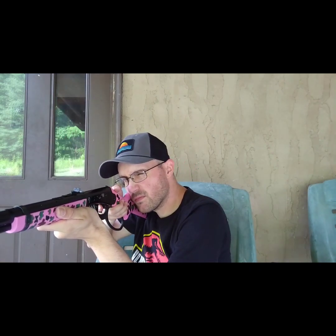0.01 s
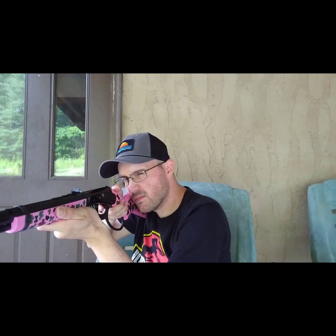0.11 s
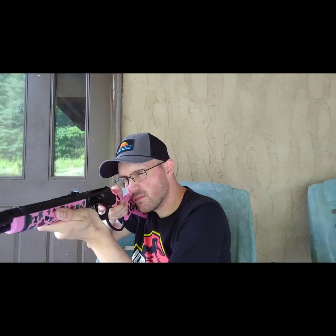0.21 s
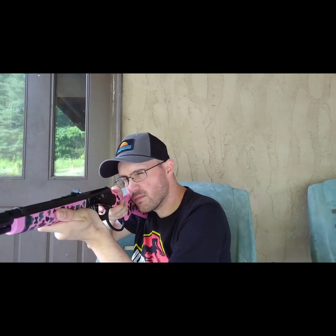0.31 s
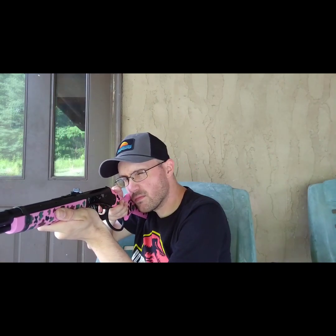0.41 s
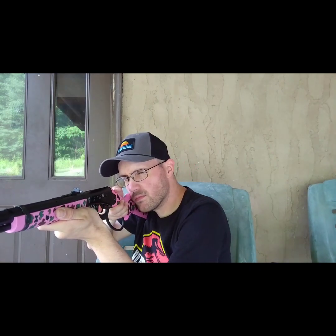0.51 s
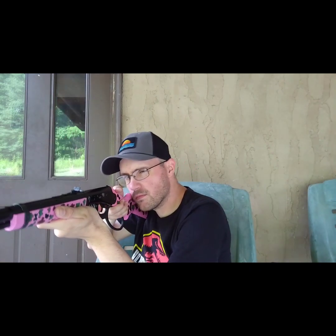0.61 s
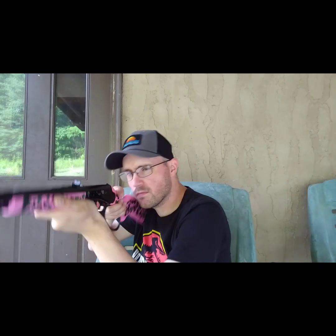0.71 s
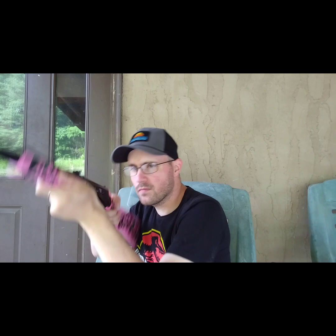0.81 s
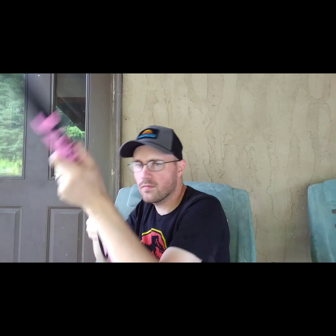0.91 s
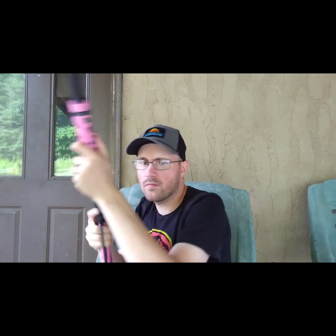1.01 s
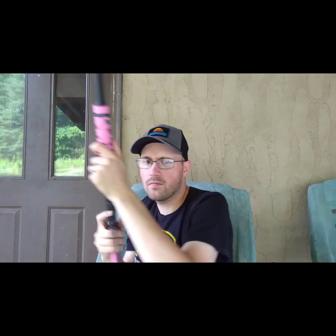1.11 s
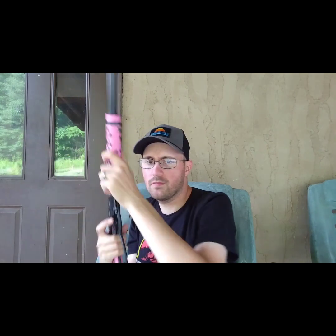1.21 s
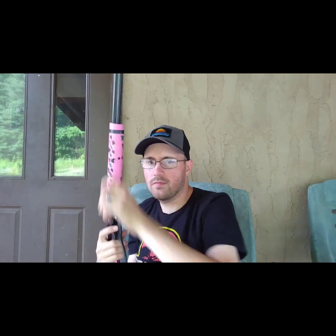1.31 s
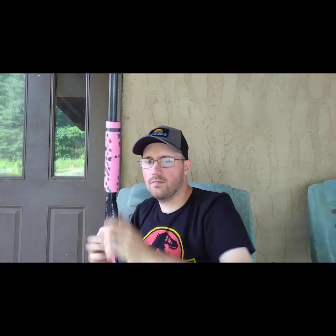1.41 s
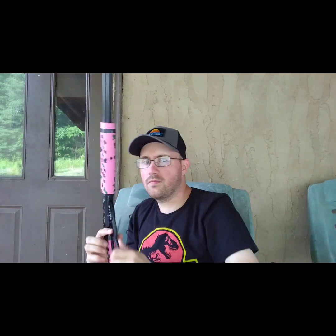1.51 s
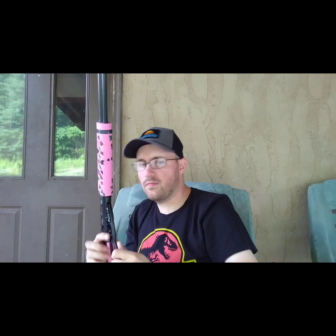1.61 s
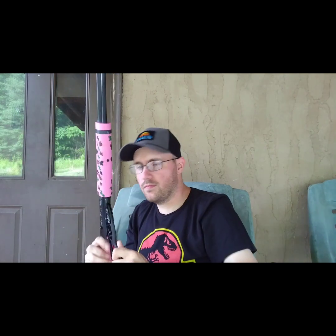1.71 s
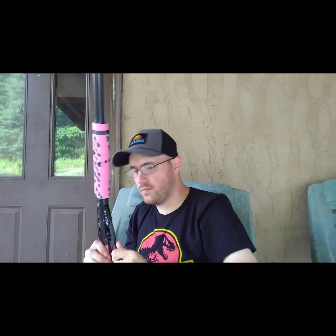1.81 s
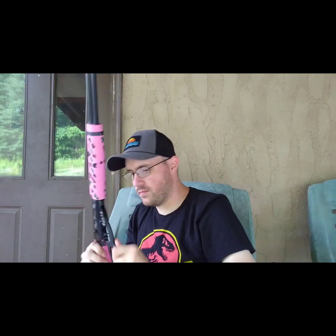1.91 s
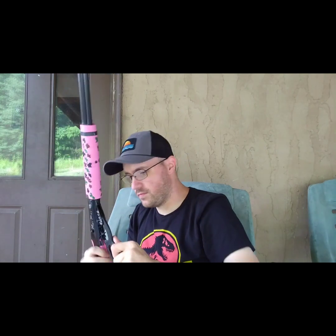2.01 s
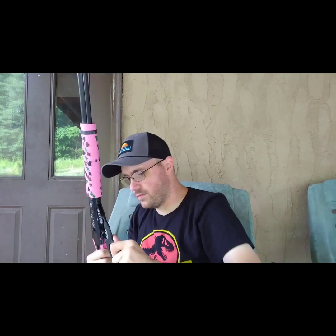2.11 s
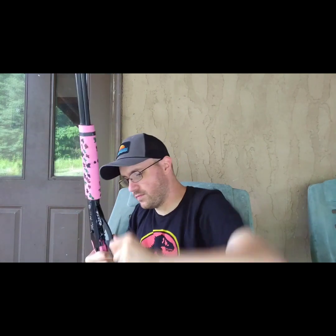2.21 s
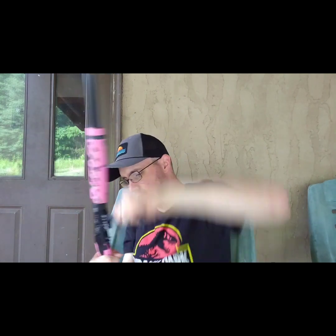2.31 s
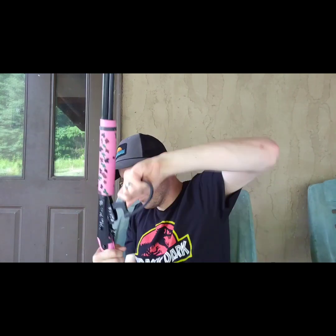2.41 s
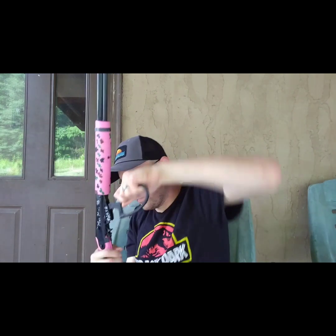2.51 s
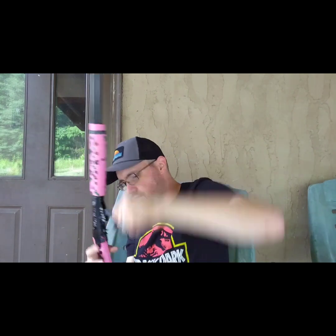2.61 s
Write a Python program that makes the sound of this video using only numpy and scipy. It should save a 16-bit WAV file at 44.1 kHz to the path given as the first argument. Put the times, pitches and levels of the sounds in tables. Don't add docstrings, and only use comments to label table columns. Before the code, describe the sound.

Spring air gun shot cracks on a porch, a can pings, pellets pour, then the lever ratchets

```python
import sys
import numpy as np
from scipy import signal
from scipy.io import wavfile

SR = 44100
rng = np.random.default_rng(int(sys.argv[2]) if len(sys.argv) > 2 else 0)


def field_ratio(decibels):
    return 10 ** (np.asarray(decibels, dtype=float) / 20)


def transcribe(signal):
    frames = np.atleast_2d(signal).T
    limited = np.clip(frames, -1, 1)
    pcm = np.round(limited * 32767).astype(np.int16)
    wavfile.write(sys.argv[1], SR, pcm)


N = 119070
T = np.arange(N) / SR
SLAM_S = .22976

# frequency in Hz, level in dB per Hz.
GUN_COLOUR = [(29, -45), (55, -13.5), (110, -9), (292, -14.5), (600, -13), (1100, -20), (2570, -6),
              (7240, -19), (8600, -27.5), (11200, -69), (18900, -120)]


def at_hz(points, hz):
    table_hz, value = np.transpose(points)
    return np.interp(np.log(hz), np.log(table_hz), value)


def curve(rows):
    s, db = np.transpose(rows)
    return field_ratio(np.interp(T, s, db, left=-200, right=-200))


def unit(x):
    return x / np.sqrt(np.mean(x ** 2) + 1e-30)


def ring(x, hz, t60):
    radius = field_ratio(-60 / (max(t60, 1e-3) * SR))
    angle = 2 * np.pi * hz / SR
    return signal.lfilter([0, np.sin(angle)], [1, -2 * radius * np.cos(angle), radius ** 2], x + 1e-18)


def click(s, db=0):
    return field_ratio(db) * (np.arange(N) == int(s * SR))


def since(s, t60):
    t = T - s
    return (t >= 0) * field_ratio(-60 * np.maximum(t, 0) / t60)


def grains(per_s, spread_db):
    size = field_ratio(spread_db * np.minimum(rng.exponential(1, N), 4))
    sign = rng.choice([-1, 1], N)
    return unit(size * sign * (rng.random(N) < per_s / SR))


def coloured(x, spectrum, shape=lambda hz: 1):
    edges = 28 * 2 ** np.arange(0, 9, .5)
    flat, shaped = 0, 0
    for k, (low, high) in enumerate(zip(edges, edges[1:])):
        hz = np.sqrt(low * high)
        sos = signal.butter(2, [low, high], "band", fs=SR, output="sos")
        band = (-1) ** k * field_ratio(at_hz(spectrum, hz)) * signal.sosfilt(sos, x)
        flat = flat + band
        shaped = shaped + band * shape(hz)
    return shaped / np.std(flat)


def diffuse(x, t60, gap_s):
    t = np.arange(int(1.2 * SR)) / SR
    response = rng.standard_normal(len(t)) * field_ratio(-60 * t / t60) * (t > gap_s)
    return signal.fftconvolve(x, response / np.sqrt(np.sum(response ** 2)))[:len(x)]


def knock(rows, strike_db=3):
    span = SR // 4
    t = np.arange(span) / SR
    out = np.zeros(N + SR)
    for s, db, hz, width_hz, t60 in rows:
        noise = rng.standard_normal(span)
        edges = [max(hz - width_hz / 2, 550), min(hz + width_hz / 2, 9000)]
        band = signal.butter(2, edges, "band", fs=SR, output="sos")
        strike = signal.sosfilt(band, (t == 0) + 1e-18)
        strike = field_ratio(strike_db) * strike / np.abs(strike).max()
        burst = field_ratio(-60 * t / t60) * (unit(signal.sosfilt(band, noise)) + .08 * noise)
        start = int(s * SR)
        out[start:start + span] += field_ratio(db) * (burst - strike)
    return out[:N]


def metal(hits, modes):
    return sum(field_ratio(db) * unit(ring(hits * rng.standard_normal(N), hz, t60)) for hz, db, t60 in modes)


def plunger_scrape():
    # time in seconds, level in dB.
    run = [
        (.2195, -38),
        (.223, -15.5),
        (.2255, -23),
        (.2285, -20),
        (.2295, -30),
        (.2325, -36),
    ]
    return curve(run) * coloured(grains(14000, 1.0), GUN_COLOUR)


def muzzle_pop():
    # frequency in Hz, level in dB, t60 in seconds.
    barrel = [(2400, 0, .007), (2950, -2, .007), (1100, 0, .008), (5000, -3, .004), (6800, -12, .003),
              (420, -2, .01)]
    puff = click(SLAM_S, -13.6) - click(SLAM_S + .00019, -8.1)
    return sum(field_ratio(db) * ring(puff, hz, t60) for hz, db, t60 in barrel)


def gun_body():
    # frequency in Hz, t60 in seconds.
    dying = [(100, 0.55), (500, 0.26), (1400, 0.28), (3000, 0.22), (8000, 0.26)]

    def fade(hz):
        early = field_ratio(-19) * since(SLAM_S + 0.002, at_hz(dying, hz))
        late = field_ratio(-39.5) * since(SLAM_S + .03, 0.96) * (hz > 1000)
        return early + late

    return coloured(grains(16000, 2.8), GUN_COLOUR, fade)


def loose_parts():
    # start in seconds, level in dB, centre in Hz, width in Hz, t60 in seconds.
    rattles = [(.2222, -18.5, 2600, 900, .025), (.228, -24, 803, 500, 0.0085),
               (.239, -25, 2380, 700, 0.046), (.247, -20, 1800, 900, 0.064),
               (.2565, -25.5, 3570, 900, 0.022), (.264, -24.5, 3010, 2500, .015),
               (.272, -25, 2500, 2000, 0.023), (.3725, -38.5, 2010, 2500, 0.019)]
    return knock(rattles, -6.0)


def spring_hum():
    # frequency in Hz, level in dB, t60 in seconds.
    spring_modes = [(143, -31, .65), (374, -32, .55), (275, -44, .3), (463, -44, .4), (662, -38, .19),
                    (802, -39, .2), (970, -35, .24), (1308, -38, .19), (1750, -30, .1), (1400, -62, 1.5),
                    (4700, -66, 1.5)]
    return sum(ring(click(SLAM_S, db), hz, t60) for hz, db, t60 in spring_modes)


def shot():
    return plunger_scrape() + loose_parts() + muzzle_pop() + gun_body() + spring_hum()


def can_ping():
    # frequency in Hz, level in dB, t60 in seconds.
    can_modes = [(2998, -44, .13), (4662, -32.5, .21), (6191, -49, .45), (6215, -54, .4), (6858, -55, .25)]
    hit_s, damped_s = .3865, .463
    ping = sum(ring(ring(click(hit_s, db - 19), hz, .006), hz, t60) for hz, db, t60 in can_modes)
    ping = ping * field_ratio(np.interp(T, [damped_s, damped_s + 0.0056], [0, -17]))
    return ping + field_ratio(-17) * diffuse(ping, 0.28, 0.015)


def bounces():
    # start in seconds, level in dB, centre in Hz, width in Hz.
    ticks = [(0.4466, -39.5, 6550, 3000), (0.496, -63, 4030, 6000), (0.517, -61, 6900, 2200),
             (.528, -52, 2800, 3600), (.533, -54, 5050, 1400), (0.55, -47, 5400, 2400),
             (0.5737, -52, 5560, 4500), (0.627, -46.5, 4810, 5000), (0.6394, -54, 4000, 3000),
             (.653, -58, 3500, 3500), (.687, -53, 4500, 1000), (.6946, -52, 4500, 1000),
             (0.712, -57, 5450, 4500), (0.726, -64, 6860, 1800), (0.9911, -57.5, 2000, 1500),
             (1.1204, -66, 5000, 5000)]
    return knock([(*row, .012) for row in ticks])


def pellets():
    # time in seconds, level in dB.
    pour = [
        (1.1, -81),
        (1.16, -55.5),
        (1.203, -44.5),
        (1.218, -50.5),
        (1.279, -48.5),
        (1.284, -38),
        (1.326, -28.5),
        (1.39, -41.5),
        (1.422, -51),
        (1.52, -68),
    ]
    # frequency in Hz, level in dB per Hz.
    tube_colour = [(180, -77), (300, -43), (802, -12), (1050, -9), (1290, -1), (1370, -5), (4200, 0.5),
                   (7170, -7), (8600, -3), (11200, -54), (18900, -120)]
    # frequency in Hz, level in dB, t60 in seconds.
    tube_modes = [(1500, -10.5, 0.022), (2276, -3.5, 0.0103), (3190, -4, 0.0045), (3955, -3, 0.018),
                  (4310, -6.5, 0.024), (7040, -8, .02)]
    full_s = 1.404
    hits, flow = grains(7000, 3.6), curve(pour)
    clatter = coloured(hits, tube_colour) * np.clip(flow / field_ratio(-38.5), .45, 1)
    hollow = 1 - since(full_s, 1e3) + since(full_s, .2)
    pouring = flow * (clatter + field_ratio(-5) * metal(hits, tube_modes) * hollow)
    pouring = signal.sosfilt(signal.butter(4, 600, "high", fs=SR, output="sos"), pouring)
    return field_ratio(-3.0) * pouring + field_ratio(-10) * diffuse(pouring, .08, 0.0032)


def lever_friction():
    # time in seconds, level in dB.
    friction = [
        (2.29, -74.5),
        (2.315, -58),
        (2.322, -50),
        (2.36, -37),
        (2.41, -40),
        (2.445, -38),
        (2.47, -50),
        (2.53, -56.5),
        (2.57, -54),
        (2.7, -66),
    ]
    # frequency in Hz, level in dB per Hz.
    action_colour = [(59, -39), (100, -21), (390, -6), (488, -15.5), (721, -2), (990, -8), (2660, 2),
                     (7410, -12), (8600, -5.5), (11200, -65), (18900, -120)]
    # frequency in Hz, level in dB, t60 in seconds.
    action_modes = [(1355, -0.5, 0.028), (2170, -6, 0.011), (2700, 3.5, 0.03), (3500, -10, 0.0082),
                    (4030, 0, 0.045), (7020, 1.5, 0.0063)]

    def load(hz):
        return np.clip((T - friction[0][0]) / 0.024 * hz / 1000, 0, 1)

    uneven = field_ratio(0.84 * unit(ring(rng.standard_normal(N), 21, 0.3)))
    rub = coloured(grains(9000, 2.5), action_colour, load)
    rub = rub + field_ratio(-10) * metal(grains(6000, 2.5), action_modes)
    return curve(friction) * uneven * rub


def lever_knocks():
    # start in
    # seconds, level in dB, centre in Hz, width in Hz, t60 in seconds.
    handling = [(1.722, -57, 2800, 3000, 0.045), (1.759, -61.5, 3200, 1500, 0.037),
                (1.974, -74, 6500, 1500, 0.056), (1.9835, -52, 1600, 400, 0.055),
                (2.0012, -48.5, 3020, 2780, 0.014), (2.004, -58, 2700, 1190, 0.051),
                (2.002, -51.5, 1260, 600, 0.09), (2.012, -63.5, 1960, 2400, 0.17),
                (2.2705, -56, 900, 700, 0.034), (2.499, -45, 4500, 6000, 0.034),
                (2.5625, -45, 3030, 4000, 0.021), (2.569, -58, 3500, 2500, .03),
                (2.6, -52.5, 4500, 5000, 0.041), (2.628, -52, 3800, 1500, .03),
                (2.6658, -55, 2780, 3000, 0.091)]
    teeth = [(2.313, -46, 3500, 900, .04), (2.3193, -29, 4000, 4500, .02), (2.3364, -21.5, 3800, 3500, .01),
             (2.3515, -24.5, 2800, 3600, .014), (2.3672, -22, 3200, 3500, .008),
             (2.3848, -22, 3200, 5000, .012), (2.3885, -25, 3600, 5600, .014),
             (2.4257, -22, 2800, 3600, .016)]
    pawl = [(2.321, -34.5, 3800, 900, 0.088), (2.338, -32.5, 3000, 1100, 0.1),
            (2.353, -32.5, 2300, 640, 0.15), (2.3515, -33, 6800, 1200, 0.026), (2.37, -32, 2300, 900, 0.12),
            (2.386, -34.5, 900, 700, 0.056), (2.392, -35.5, 6670, 1300, 0.1),
            (2.409, -39, 4500, 900, 0.025), (2.43, -30, 4030, 600, 0.039), (2.428, -44.5, 1100, 700, 0.13)]
    # start in seconds, level in dB, frequency in Hz, t60 in seconds.
    latch = [
        (2.4985, -33.5, 1410, .04),
        (2.5058, -38, 1370, .03),
        (2.5105, -41, 1430, .02),
        (2.5, -43, 2700, .025),
    ]
    knocks = knock(handling) + knock(teeth) + knock(pawl, -18)
    knocks = knocks + sum(ring(click(s, db), hz, t60) for s, db, hz, t60 in latch)
    return knocks + field_ratio(-9) * diffuse(knocks, .12, .004)


def rustle():
    # time in seconds, level in dB.
    movement = [
        (.3, -46),
        (.5, -60),
        (.7, -69.5),
        (.82, -68.5),
        (.85, -71),
    ]
    # frequency in Hz, level in dB per Hz.
    cloth_colour = [(60, 8.5), (300, -1.5), (1500, -11.5), (5000, -12), (8000, -13.5)]
    return curve(movement) * coloured(grains(2000, 4.0), cloth_colour)


def bird():
    # start in seconds, level in dB.
    phrases = [
        (-.079, -44),
        (.307, -39),
        (0.696, -43.5),
    ]
    # offset in seconds, length in seconds, start in Hz, end in Hz, level in dB.
    notes = [
        (-.008, .06, 3640, 3580, -4),
        (.031, .028, 3400, 3180, -1),
        (.055, .045, 3960, 4300, -4),
        (.11, .062, 2640, 2790, 3),
        (.186, .026, 3120, 2900, -2),
        (.228, .058, 2390, 2490, -4),
        (.291, .024, 2480, 2330, -8),
    ]
    # echo delay in seconds, level in dB.
    trees = [(0.026, -20), (.058, -18), (.1, -19), (.15, -20)]
    lead = SR // 2
    song = np.zeros(N + SR)
    for start, db in phrases:
        for offset, length, hz0, hz1, note_db in notes:
            u = np.linspace(0, 1, int(length * SR))
            flutter = .2 * np.sin(2 * np.pi * 120 * length * u)
            hz = hz0 + (hz1 - hz0) * (u ** .7 + flutter)
            skew = 1.45 if length > .05 else .55
            swell = np.sin(np.pi * u ** skew) ** 1.1
            i = lead + int((start + offset) * SR)
            song[i:i + len(u)] += field_ratio(db + note_db) * swell * np.sin(2 * np.pi * np.cumsum(hz) / SR)
    echoes = sum(field_ratio(db) * diffuse(np.roll(song, int(s * SR)), 0.06, 0) for s, db in trees)
    woods = field_ratio(-12) * diffuse(song, 0.65, 0.039)
    return (song + echoes + woods)[lead:lead + N]


def insect():
    pulse = (1 + np.sin(2 * np.pi * 38 * T)) * since(.8, 100)
    return field_ratio(-87) * pulse * unit(ring(rng.standard_normal(N), 5820, .25))


def air():
    # frequency in Hz, level in dB per Hz.
    air_colour = [(18, -42), (30, -10), (81, -1.5), (230, -17.5), (886, -24.5), (974, -24.5), (4130, -29.5),
                  (5620, -37), (8600, -41.5), (11200, -78), (18900, -120)]
    return field_ratio(-64.5) * coloured(rng.standard_normal(N), air_colour)


def scene():
    gun = shot() + pellets() + lever_friction() + lever_knocks() + rustle()
    target = can_ping() + bounces()
    return (gun + target + bird() + insect() + air())[None]


def band_limit(x):
    return signal.sosfilt(signal.butter(12, 15600, fs=SR, output="sos"), x)


def record(dry):
    cut = signal.sosfilt(signal.cheby1(10, .5, 7753, fs=SR, output="sos"), dry)
    cut = signal.sosfilt(signal.butter(2, 69.4, "high", fs=SR, output="sos"), cut)
    overloaded = np.clip(cut, -.99, .99)
    return band_limit(overloaded + field_ratio(-101.5) * rng.standard_normal(dry.shape))


dry = scene()
out = record(dry)
transcribe(out)
```